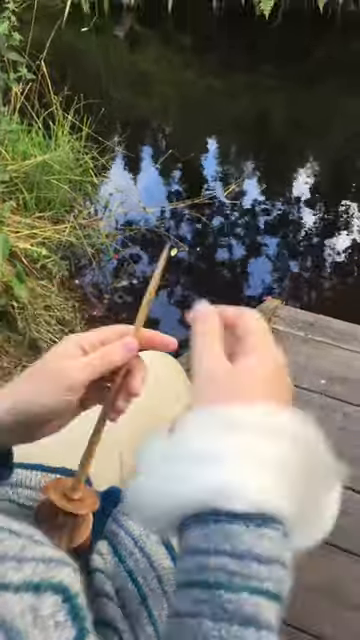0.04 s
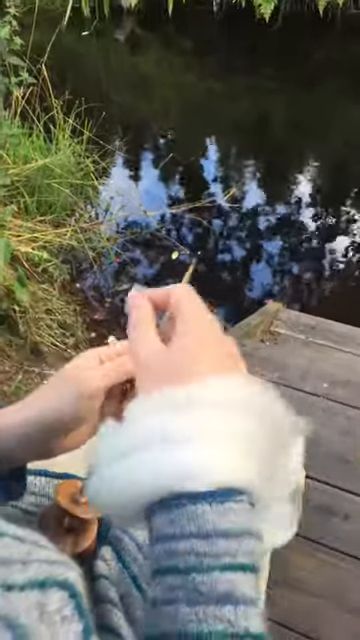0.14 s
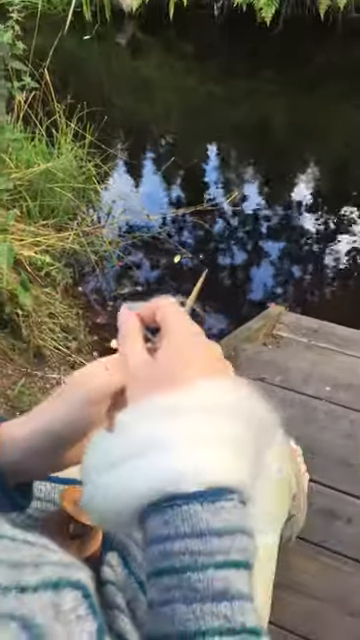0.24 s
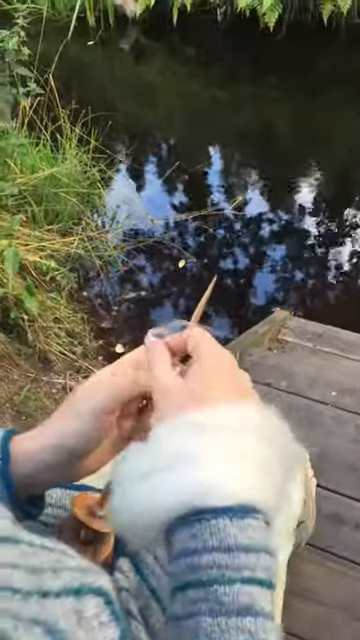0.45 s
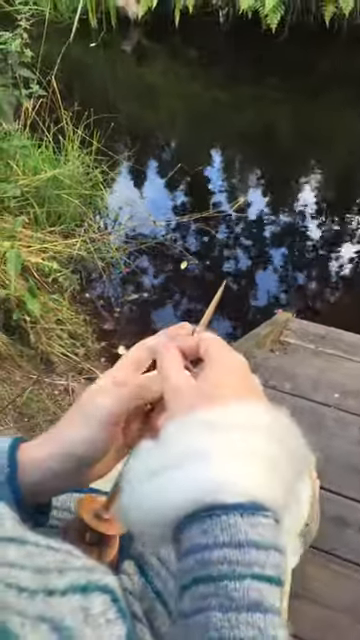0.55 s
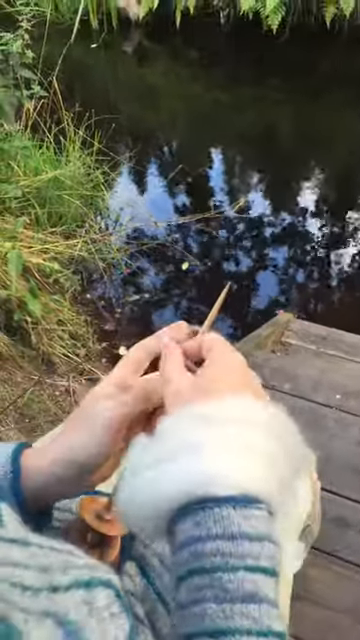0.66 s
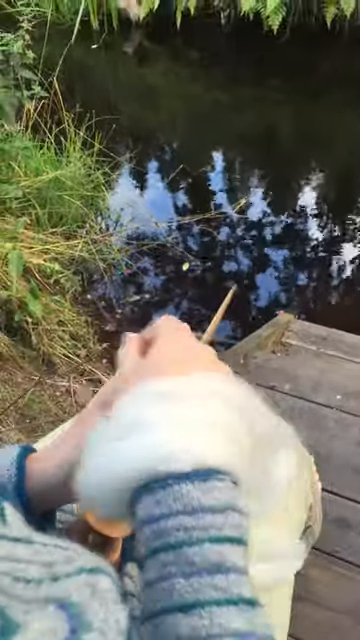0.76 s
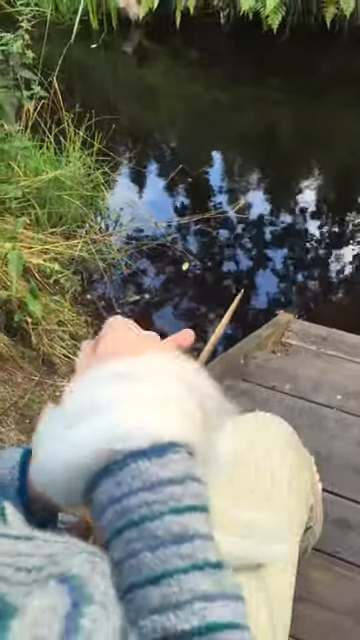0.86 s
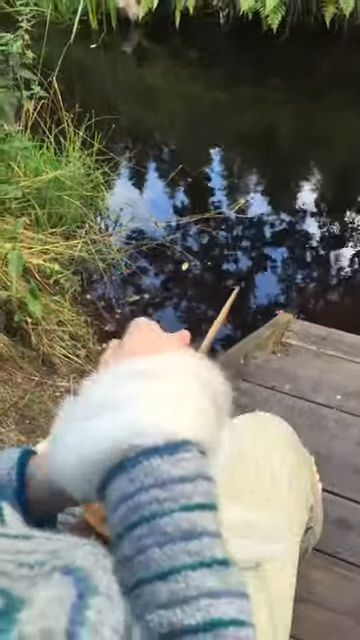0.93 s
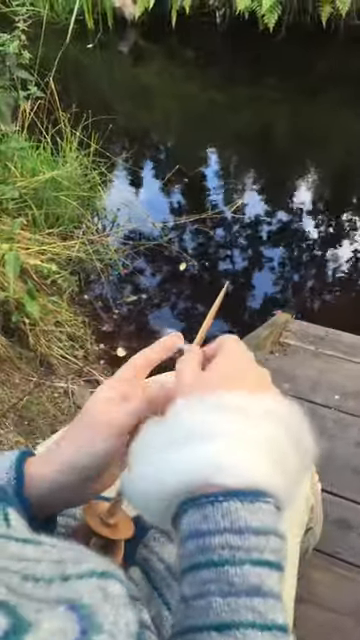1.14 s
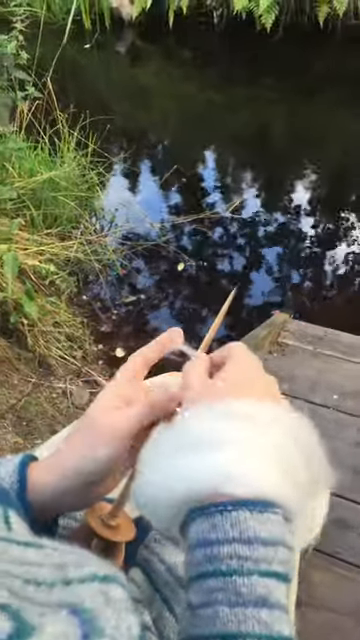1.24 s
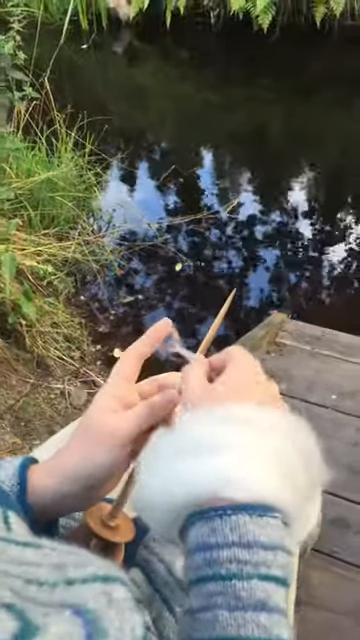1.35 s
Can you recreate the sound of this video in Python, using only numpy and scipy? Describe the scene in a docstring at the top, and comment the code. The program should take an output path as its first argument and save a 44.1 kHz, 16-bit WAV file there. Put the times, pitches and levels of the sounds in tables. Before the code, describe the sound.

A single crisp knock of a small wooden spindle comes early, with a very short rattle and soft low settling thump; quiet outdoor hiss and faint water plops run throughout, heard by one close microphone.

```python
"""Outdoors, one microphone, 1.4 s: soft hiss (shaped noise) lies beneath throughout.
From the start water plops and gurgles faintly under a deck: short swelling sines that climb in pitch.
At a quarter of a second a small hard wooden spindle is knocked once: ringing modes and a crack of noise.
It rattles in a few bounces of tiny contacts and settles with a low thump, a sine of sagging pitch.
The water and the hiss go on to the end."""
import sys
import numpy as np
from scipy import signal
from scipy.io import wavfile
from scipy.ndimage import uniform_filter1d

SR = 44100
rng = np.random.default_rng(int(sys.argv[2]) if len(sys.argv) > 2 else 0)


def voltage_ratio(level):
    """Linear amplitude factor for a level in decibels (scalar or array-like)."""
    return 10 ** (np.asarray(level, float) / 20)


def output_pcm(signal):
    """Save a mono or channel-first signal as 16-bit PCM at the path in sys.argv[1].

    Samples are clipped to [-1, 1] before scaling.
    """
    pcm = np.clip(np.atleast_2d(signal).T, -1, 1) * 32767
    wavfile.write(sys.argv[1], SR, np.round(pcm).astype(np.int16))


N = 61739

# Spectrum of the outdoor hiss, relative: pitch_hz [Hz], level_db [dB per Hz]
HISS_SPECTRUM = [(15, -35), (32, -28), (50, 2.5), (75, -1), (150, 1), (250, -4), (470, -5.5), (800, -8.5),
                 (1630, -9.5), (4540, -14.5), (8910, -19), (10500, -22.5), (12000, -21), (15700, -23.5)]
# Clear bubbles under the deck: start_s [s], level_db [dB], pitch_hz [Hz], length_s [s],
# rise [share of the pitch gained per length]
BUBBLES = [(.0, -72, 490, 0.033, .03), (.057, -59.5, 691, 0.031, .5), (.058, -65, 2910, 0.012, 0.017),
           (0.059, -69.5, 2440, 0.0088, 0.017), (0.09, -68.5, 980, 0.018, 0.045),
           (0.123, -62.5, 829, 0.019, .03), (.128, -60.5, 492, 0.029, 0.011),
           (0.197, -67, 690, 0.018, 0.027), (0.212, -69.5, 1010, 0.036, 0.083),
           (0.381, -63, 520, .02, 0.038), (.453, -58, 477, 0.024, .03), (0.464, -66, 1907, 0.011, .03),
           (.4835, -55.5, 1950, 0.0048, 0.098), (0.495, -61, 1910, 0.0027, 0.025),
           (0.501, -63.5, 552, 0.022, .025), (0.54, -67, 2260, .005, .03), (.549, -71.5, 854, 0.016, .035),
           (0.544, -72, 1368, 0.028, 0.024), (.742, -69.5, 665, 0.022, 0.07),
           (.745, -68.5, 437, .025, 0.12), (.805, -59.5, 411, 0.032, .054), (.806, -64, 684, 0.039, 0.023),
           (0.849, -67, 383, 0.014, 0.024), (0.885, -65.5, 417, 0.023, 0.026),
           (0.903, -74.5, 690, 0.028, 0.026), (.966, -70, 480, 0.037, 0.026),
           (0.995, -69.5, 430, 0.015, 0.07), (1.001, -73.5, 676, 0.038, 0.044),
           (1.065, -68, 2910, .007, 0.023), (1.083, -65.5, 2210, 0.012, .08),
           (1.137, -68.5, 407, .016, 0.021), (1.238, -64, 407, 0.024, 0.11),
           (1.309, -67.5, 1627, 0.017, 0.042), (1.326, -71, 2110, 0.012, .03)]
# Lasting modes of the spindle: pitch_hz [Hz], level_db [dB], t60_s [s], build_up_s [s]
WOOD_MODES = [(826, -28.5, 0.03, 0.00034), (1016, -15, 0.016, 0.0004), (1290, -12, 0.014, 0.00042),
              (1488, -26.5, 0.025, 0.00075), (2134, -7, 0.039, 0.0015), (2106, -16, 0.02, .0004),
              (3242, -4, 0.026, 0.00089), (3323, -16.5, 0.042, 0.00067), (4490, -16.5, 0.035, 0.00033),
              (4755, -8, 0.021, 0.00088), (6044, 26, 0.011, 0.003), (6700, -19, 0.041, 0.00043),
              (10700, -34.5, 0.05, 0.00037)]
# Broad short resonances of the contact itself: pitch_hz [Hz], level_db [dB], t60_s [s], build_up_s [s]
CLATTER_MODES = [(586, -10.5, 0.0066, 0.00038), (980, 1.5, 0.0052, 0.00021), (1413, -2.5, 0.0083, 0.00027),
                 (2810, -23, 0.031, 0.00053), (3600, 4.5, 0.011, 0.00018), (3730, -8.5, 0.013, 0.0001),
                 (4780, -5, 0.0066, 0.00016), (5530, -1.5, .012, 0.00024), (6800, 9, 0.0092, 0.00018),
                 (7820, -17, 0.03, 0.000093), (9840, -16, 0.0085, 0.00013), (13120, -15, 0.0043, 0.0013)]
# Knock and bounces: start_s [s], level_db [dB], tilt_db [dB per octave], dull_hz [Hz, treble falls above],
# clatter_db [dB against the wood]
CONTACTS = [(0.2495, -22.5, -0.47, 19800, -7), (.2625, -44.5, -11, 3500, -10),
            (0.2651, -47.5, 4.5, 5160, -4.5), (.2682, -34, -6, 3860, -15), (0.2741, -36, 0.5, 4350, -10.5),
            (0.2757, -32, -6, 3600, -16.5), (0.2842, -50, -5.5, 4200, 0.5), (0.3028, -59, -1, 9000, -12),
            (0.3078, -60.5, -1, 9000, -12)]

HISS_DB, PATCH_DB = -69.5, 0.4
RUMBLE_HZ, LUMP_DB = 247, 2.5
PLOP_SWELL = 0.49  # swell time as a share of the plop's length
GURGLES_PER_S, GURGLE_DB, GURGLE_SPREAD_DB = 40, -75, 3
GURGLE_LOW_HZ, GURGLE_HIGH_HZ, GURGLE_CYCLES = 380, 2800, 9
WOBBLE = 0.33  # unevenness of the water's level, as a share
THUMP_S, THUMP_DB, THUMP_RISE_S = 0.2642, -54, 0.0155
THUMP_HZ, THUMP_SAG, THUMP_SAG_S = 48, 3.4, 0.008  # resting pitch, extra share at the start, its decay
PIVOT_HZ = 2120  # the spectral tilt turns about this pitch
RATTLE_S, RATTLE_PEAK_S, RATTLE_PER_S = 0.253, 0.015, 900  # peak counted from the start
RATTLE_DB, RATTLE_SPREAD_DB = -55, 4.0
RATTLE_TILT_DB, RATTLE_DULL_HZ, RATTLE_CLATTER_DB = -1.5, 4300, -4
DETUNE = 0.012  # typical shift of the modes at each contact point, as a share
CRACK_T60_S, CRACK_LOW_HZ, CRACK_HIGH_HZ = 0.021, 520, 6500
SPRAY_DB, SPRAY_T60_S, SPRAY_HZ, SPRAY_TOP_HZ = -9.5, 0.022, 7000, 12700  # treble part of the crack
BODY_LOW_HZ = 480  # the thin spindle radiates little below this
TAIL_DB, TAIL_T60_S = -30, 0.13  # scatter from boards and hands
EDGE_HZ = 15850


def evened(x):
    """Scales a signal to an rms of one."""
    return x / np.sqrt(np.mean(x ** 2) + 1e-20)


def add(mix, start_s, sound):
    """Lays a sound into the mix at its start, cut at the end of the mix."""
    part = mix[round(start_s * SR):][:len(sound)]
    part += sound[:len(part)]


def hiss():
    """Smooth outdoor noise with faint patches in time and pitch; its rumble comes in lumps."""
    frames, hz = N // 512 + 5, np.fft.rfftfreq(2048, 1 / SR)
    real, imag, patches = rng.standard_normal((frames, 1025, 3)).T
    patches = uniform_filter1d(patches, 20, axis=0)  # across pitch
    patches = evened(uniform_filter1d(patches, 5, axis=1))  # across time
    lumps = evened(uniform_filter1d(rng.standard_normal(frames), 3))
    point_hz, point_db = np.transpose(HISS_SPECTRUM)
    shape_db = np.interp(np.log(hz + 1), np.log(point_hz + 1), point_db)[:, None]
    low = 1 / (1 + (hz[:, None] / RUMBLE_HZ) ** 2)
    level_db = shape_db + PATCH_DB * patches + LUMP_DB * low * lumps
    noise = signal.istft((real + 1j * imag) * voltage_ratio(level_db), nperseg=2048, noverlap=1536)[1][:N]
    return voltage_ratio(HISS_DB) * evened(noise)


def plop(level_db, pitch_hz, length_s, rise):
    """A bubble: a short sine that swells, fades and climbs in pitch."""
    u = np.arange(0, 1.5 * length_s, 1 / SR) / length_s
    v = u / PLOP_SWELL
    close = np.cos(np.pi * u / 3)  # reaches silence at 1.5 lengths
    phase = 2 * np.pi * np.cumsum(pitch_hz * (1 + rise * u)) / SR
    return voltage_ratio(level_db) * v * np.exp(1 - v) * close * np.sin(phase)


def water():
    """Clear bubbles and a random scatter of fainter ones under the deck, all a little uneven."""
    out = np.zeros(N)
    for start_s, *bubble in BUBBLES:
        add(out, start_s, plop(*bubble))
    for when, height, strength, climb in rng.random((200, 4)):
        # the cube favours low gurgles
        pitch_hz = GURGLE_LOW_HZ * (GURGLE_HIGH_HZ / GURGLE_LOW_HZ) ** (height ** 3)
        level_db = GURGLE_DB + GURGLE_SPREAD_DB * (2 * strength - 1)
        gurgle = plop(level_db, pitch_hz, GURGLE_CYCLES / pitch_hz, 0.1 * climb)
        add(out, when * 200 / GURGLES_PER_S, gurgle)  # those past the end go unheard
    drift = uniform_filter1d(rng.standard_normal(N), size=50)
    drift = evened(uniform_filter1d(drift, size=50))
    return out * (1 + WOBBLE * drift)


def thump():
    """The spindle settles: a soft low push, a sine under a smooth swell, its pitch sagging."""
    out, t = np.zeros(N), np.arange(6000) / SR
    u = t / THUMP_RISE_S
    hz = THUMP_HZ * (1 + THUMP_SAG * np.exp(-t / THUMP_SAG_S))
    swell = u ** 2 * np.exp(2 - 2 * u)
    push = -voltage_ratio(THUMP_DB) * swell * np.sin(2 * np.pi * np.cumsum(hz) / SR)
    add(out, THUMP_S, push)
    return out


def ring(modes, t, tilt_db, dull_hz):
    """Modes as a sum of dying sines, the treble weak where the contact is soft."""
    hz, mode_db, t60_s, build_up_s = np.transpose(modes)[:, :, None]
    reach = voltage_ratio(tilt_db * np.log2(hz / PIVOT_HZ)) / (1 + (hz / dull_hz) ** 6)
    decay = voltage_ratio(mode_db - 60 * t / t60_s)
    build_up = (1 - np.exp(-t / build_up_s)) ** 2
    return (reach * decay * build_up * np.sin(2 * np.pi * hz * t)).sum(0)


def rattle():
    """A dense shiver of tiny contacts, each catching the wood at one of six slightly different spots."""
    out, t = np.zeros(N), np.arange(3000) / SR
    u = np.maximum(np.arange(N) / SR - RATTLE_S, 0) / RATTLE_PEAK_S
    swell = u * np.exp((1 - u ** 2) / 2)
    size = voltage_ratio(RATTLE_SPREAD_DB * np.minimum(rng.exponential(1, N), 3)) * rng.choice([-1, 1], N)
    struck = rng.random(N) < RATTLE_PER_S / SR
    hits = voltage_ratio(RATTLE_DB) * swell * size * struck
    spot = rng.integers(0, 6, N)
    for k, shift in enumerate(1 + DETUNE * rng.standard_normal(6)):
        wood = ring(WOOD_MODES, t * shift, RATTLE_TILT_DB, RATTLE_DULL_HZ)
        clatter = ring(CLATTER_MODES, t * shift, RATTLE_TILT_DB, RATTLE_DULL_HZ)
        tap = wood + voltage_ratio(RATTLE_CLATTER_DB) * clatter
        out += signal.fftconvolve(hits * (spot == k), tap)[:N]
    return out


def blow(level_db, tilt_db, dull_hz, clatter_db, noise):
    """One contact rings the wood, with clatter and a crack of noise."""
    t = np.arange(len(noise)) / SR
    band = signal.butter(2, [CRACK_LOW_HZ, min(CRACK_HIGH_HZ, dull_hz)], "band", fs=SR)
    crack = signal.lfilter(*band, noise * voltage_ratio(-60 * t / CRACK_T60_S))
    band = signal.butter(2, [SPRAY_HZ, SPRAY_TOP_HZ], "band", fs=SR)
    spray = signal.lfilter(*band, noise * voltage_ratio(SPRAY_DB - 60 * t / SPRAY_T60_S))
    spray = spray / (1 + (SPRAY_HZ / dull_hz) ** 2 / 4)  # a soft contact sprays less
    clatter = crack + spray + ring(CLATTER_MODES, t, tilt_db, dull_hz)
    return voltage_ratio(level_db) * (ring(WOOD_MODES, t, tilt_db, dull_hz) + voltage_ratio(clatter_db) * clatter)


def spindle():
    """The knock, its bounces and rattle through a thin body, and their tail scattered as dying noise."""
    out = rattle()
    noises = rng.standard_normal((len(CONTACTS), 4000))
    for (start_s, *contact), noise in zip(CONTACTS, noises):
        add(out, start_s, blow(*contact, noise))
    out = signal.lfilter(*signal.butter(3, BODY_LOW_HZ, "high", fs=SR), out)
    t = np.arange(8000) / SR
    # the root brings the tail's energy to about one before TAIL_DB
    fade = voltage_ratio(TAIL_DB - 60 * t / TAIL_T60_S) / np.sqrt(TAIL_T60_S * SR / 14)
    tail = signal.fftconvolve(out, fade * rng.standard_normal(len(t)))[:N]
    return out + tail


def scene():
    """Everything at one microphone, on one channel."""
    return (spindle() + thump() + water() + hiss())[None]


def low_pass(x):
    """Removes everything above the highest recorded frequency."""
    return signal.sosfilt(signal.butter(12, 15850, fs=SR, output="sos"), x)


def record(dry):
    """Limits the band of the microphone signal with a steep low-pass at EDGE_HZ."""
    edge = signal.firwin(255, EDGE_HZ, fs=SR)
    mix = signal.oaconvolve(dry, edge[None], "same")
    return low_pass(mix)


dry = scene()
out = record(dry)
output_pcm(out)
```